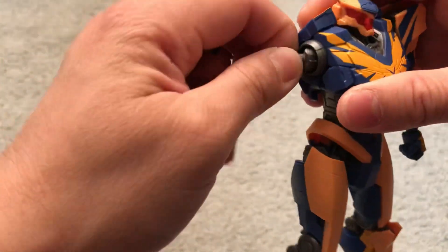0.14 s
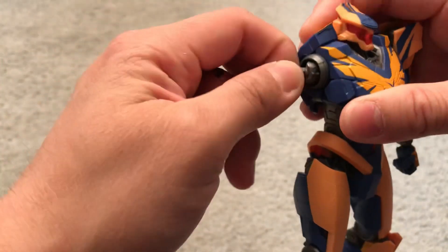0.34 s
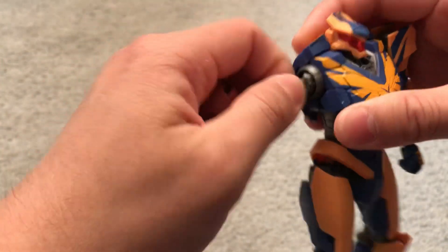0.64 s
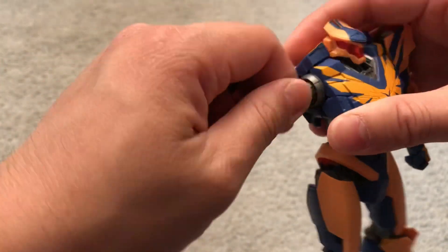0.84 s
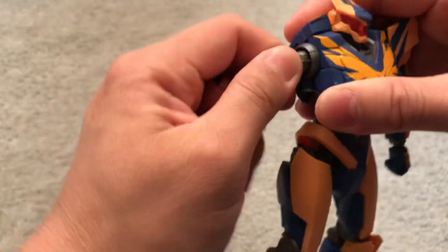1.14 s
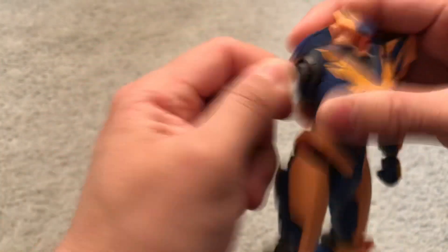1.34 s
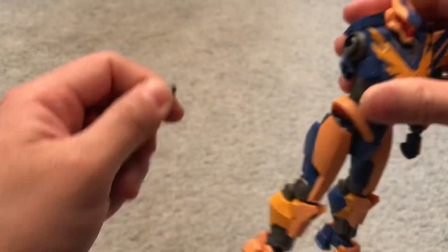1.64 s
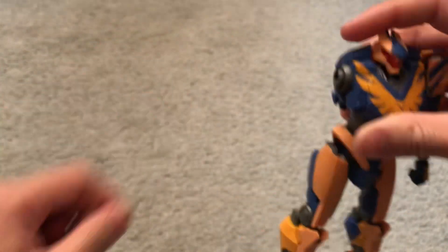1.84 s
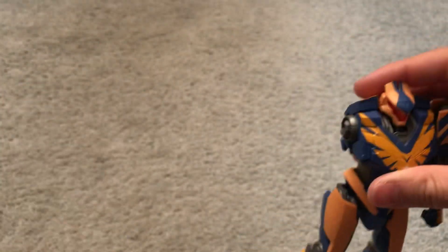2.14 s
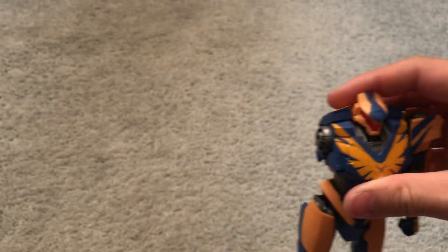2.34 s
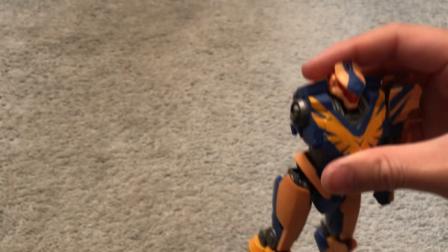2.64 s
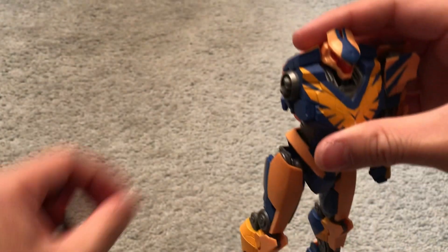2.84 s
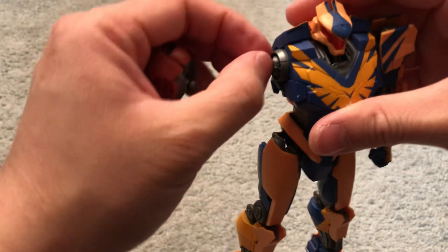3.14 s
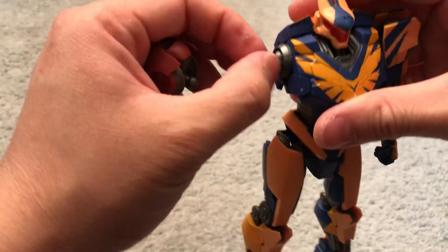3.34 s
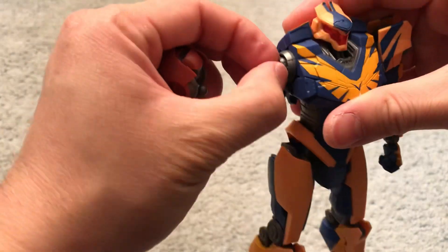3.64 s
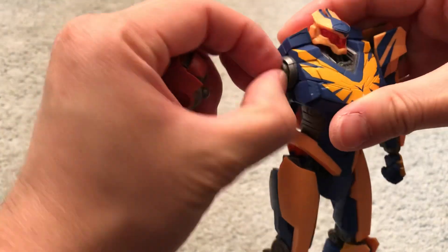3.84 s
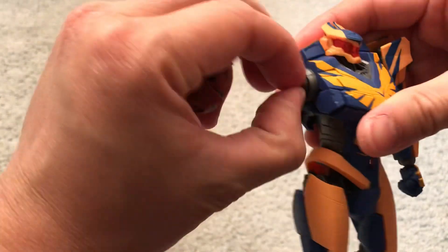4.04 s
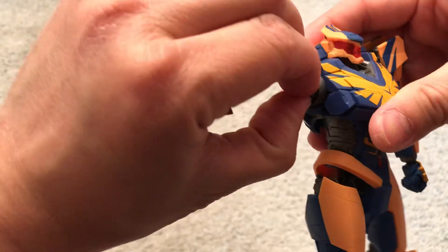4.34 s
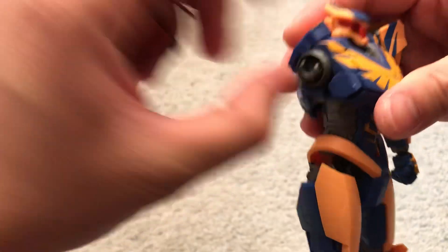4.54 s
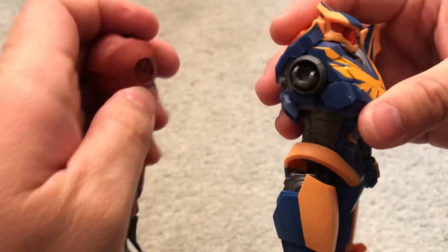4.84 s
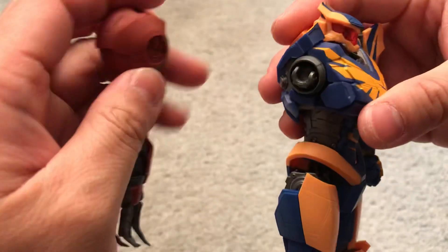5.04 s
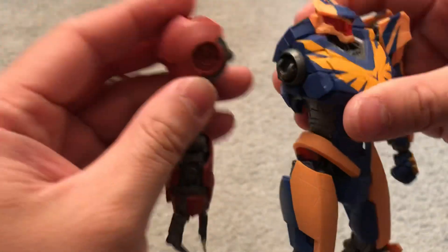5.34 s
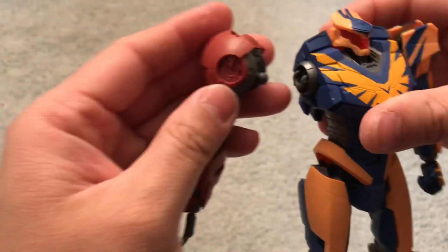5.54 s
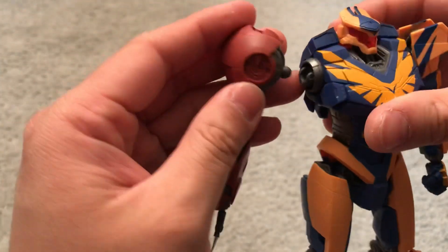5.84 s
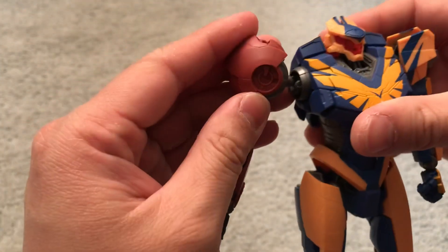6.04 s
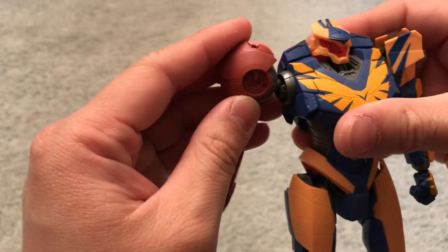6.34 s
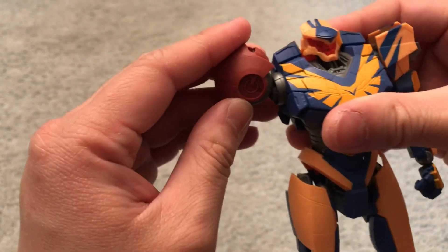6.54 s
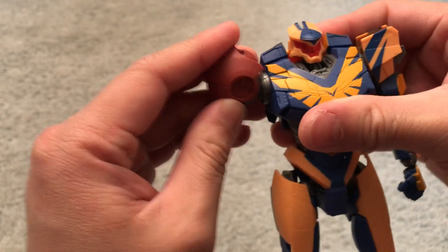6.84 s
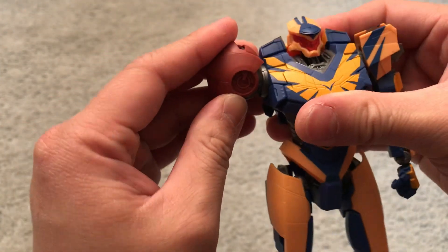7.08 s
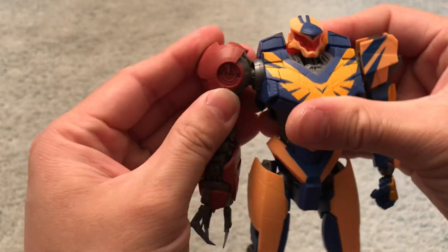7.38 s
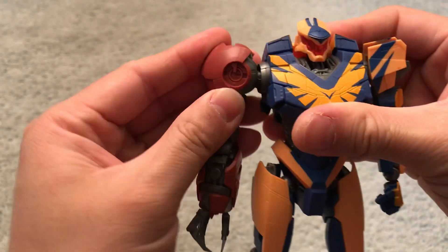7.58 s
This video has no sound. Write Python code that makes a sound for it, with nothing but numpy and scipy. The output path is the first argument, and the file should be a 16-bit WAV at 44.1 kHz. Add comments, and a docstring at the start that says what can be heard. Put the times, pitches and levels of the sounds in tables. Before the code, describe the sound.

Hard plastic toy joints click and snap close up while fingers rub and squeak on the shell, over faint low hum and hiss.

```python
"""Twisting the joints of a plastic toy

Hands twist and plug the joints of a hard plastic toy figure close to the microphone in a carpeted room.
Joints slip and snap in tiny volleys and fingers rub the hollow shell: both set its modes ringing, and the
room answers. Rubs also squeak, and padded contacts thump in one low mode. A motor hums in multiples of
its turning rate beside a mains buzz and a rising tone; noise makes the hiss and a low rush that swells twice."""
import sys
import numpy as np
from scipy import signal
from scipy.fft import rfft, irfft, next_fast_len
from scipy.io import wavfile
from scipy.ndimage import map_coordinates

SR = 44100
rng = np.random.default_rng(int(sys.argv[2]) if len(sys.argv) > 2 else 0)


def put_to_file(sound):
    """Save the sound as 16-bit audio at rate SR, in the file named by the first command-line argument."""
    columns = np.atleast_2d(sound).T  # one column per channel
    safe = np.clip(columns, -1, 1)
    whole_steps = np.round(safe * 32767)
    wavfile.write(sys.argv[1], SR, whole_steps.astype(np.int16))


N = 340011   # length of the sound in samples


def from_db(db):
    """Turn decibels into a plain factor."""
    return 10 ** (np.asarray(db) / 20)


def rms_one(x):
    """Scale a sound so that its average strength (rms) is 1."""
    return x / np.sqrt(np.mean(x ** 2) + 1e-20)


def in_time(rows):
    """Columns of a curve table, joined by straight lines, at every sample."""
    s, *columns = np.transpose(rows)
    return [np.interp(np.arange(N) / SR, s, c) for c in columns]


def at_hz(hz, table_hz, values):
    """Read a curve at a pitch; pitch is spaced by ratio, as the ear hears it."""
    return np.interp(np.log(hz), np.log(table_hz), values)


def drift(rate):
    """Slow random wandering of spread about 1, with about rate changes a second."""
    knots = rng.standard_normal(int(N / SR * rate) + 2)
    return map_coordinates(knots, [np.arange(N) / SR * rate], order=3)


def ring(x, hz, t60):
    """A resonance: a unit click starts a sine of height 1 that falls 60 dB in t60 seconds."""
    r = from_db(-60 / (t60 * SR))
    w = 2 * np.pi * hz / SR
    return signal.lfilter([0, np.sin(w)], [1, -2 * r * np.cos(w), r * r], x + 1e-18)


def shaped(spectrum):
    """Noise of rms 1 that follows a (Hz, dB) curve and fades steeply below its first pitch."""
    size = next_fast_len(N)
    hz = np.maximum(np.arange(size // 2 + 1) * SR / size, 1)
    low_fade = np.minimum(hz / spectrum[0][0], 1) ** 4
    gain = from_db(at_hz(hz, *np.transpose(spectrum))) * low_fade
    return rms_one(irfft(rfft(rng.standard_normal(size)) * gain, size)[:N])


# Motor hum. Each row: time in seconds, level in dB of the 2nd and of the 3rd multiple of the turning rate.
MOTOR = [(0, -73, -62), (.3, -57.5, -64.5), (1.5, -55.5, -61.5), (1.85, -68, -62.5), (2.5, -56.5, -58),
         (3.7, -59, -60.5), (4.2, -55.5, -58), (5, -59, -56), (5.6, -56, -60), (6.2, -57, -55.5),
         (7.05, -64, -59), (7.3, -53.5, -58), (7.71, -56, -59)]
# A faint tone that rises and fades. Each row: time in seconds, pitch in Hz, level in dB.
RISING_TONE = [(0, 69.45, -68), (.7, 74.5, -68), (1.3, 78.4, -59), (1.8, 80.5, -83)]
TURNS_HZ, FOURTH_DB, FIFTH_DB = 22.35, -67.5, -70.5   # mean turning rate; level of its 4th and 5th multiple
MAINS_HZ, MAINS_DB = 120.5, -62


def hum(waver_db):
    """A motor sounds at multiples of its turning rate; mains buzz and rising tone join, all wavering a little."""
    turns = TURNS_HZ * (1 + .006 * drift(2.2))
    multiples_db = [*in_time(MOTOR), FOURTH_DB, FIFTH_DB]
    tones = [(k * turns, db + waver_db * drift(3.9)) for k, db in enumerate(multiples_db, start=2)]
    for hz, db in ((np.full(N, MAINS_HZ), MAINS_DB), in_time(RISING_TONE)):
        tones.append((hz, db + 0.71 * drift(4.3)))
    out = np.zeros(N)
    for hz, db in tones:
        phase = 2 * np.pi * np.cumsum(hz) / SR + rng.uniform(0, 6.8)
        out += from_db(db) * np.sin(phase)
    return np.sqrt(2) * out   # makes each level an rms level


# Colour of room air and microphone hiss. Each row: pitch in Hz, relative level in dB per Hz.
AIR = [(25, -13), (45, -2.5), (75, -1.5), (130, -11.5), (300, -15.5), (500, -20.5), (1000, -25),
       (2500, -30), (6000, -33.5), (8000, -36.5), (9200, -34.5), (10500, -38.5), (12000, -31),
       (15500, -38.5)]
AIR_DB = -65   # rms level of the whole hiss


def air():
    """Room air and microphone hiss: steady noise, strongest in the bass."""
    return from_db(AIR_DB) * shaped(AIR)


KNEE_HZ = 4200   # a contact's push changes slope at this pitch
BEND_DB = -1.0   # the push droops far from the knee, in dB per octave squared


def colour_db(rows, hz):
    """How hard each contact drives a mode at hz: two slopes that meet at the knee."""
    level_db, below, above = np.transpose(rows)[-4:-1]
    octaves = np.log2(hz / KNEE_HZ)
    slope = np.where(octaves < 0, below, above)
    return level_db + octaves * (slope + BEND_DB * octaves)


# Joint clicks. Each row: start in seconds, favoured pitch in Hz, its lift in dB, relative level in dB at the knee,
# slope below and slope above the knee in dB per octave, relative dB sent past the hands into the room.
CLICKS = [(0.0523, 2350, 3.7, -50, 4, -13, -5), (0.0893, 2300, 3.9, -65, -8, -7, 1),
          (0.138, 4600, 5.7, -48.5, 8, -4.5, -11), (0.2271, 4400, 3.7, -44.5, 7, -4, -7),
          (0.3739, 6050, 10, -50, 7, -5, -10), (0.4948, 4690, 6, -47, 2, 0, -6),
          (0.5715, 4360, 5, -61, 5, -1.5, 0), (0.6103, 4570, 4.3, -44.5, 8.5, -6, -3.5),
          (0.7765, 4130, 5, -57, 10, -7, -6), (0.8105, 2100, 5.5, -54.5, 4, -5, -3),
          (0.8494, 8270, 5, -79, 0, 6, -4), (0.9542, 4520, 5.8, -57.5, 3, -5, -1),
          (0.9758, 4650, 5, -68, -3, -7, -2), (1.0158, 4260, 5, -76, 2, 0, -4),
          (1.115, 2410, 4.6, -77, -4, -2, -1), (1.2252, 5600, 5, -54.5, 1.5, -1.5, -7),
          (1.2877, 4570, 5, -54.5, 4, -5.5, -4), (1.3287, 9600, 5.7, -32.5, 0, 1, -6),
          (1.357, 5940, 5, -52, 10, -3, -9), (1.4703, 2520, 5, -58, -1, -10.5, 1),
          (1.5206, 2890, 5, -81, -5, -1, -4), (1.586, 6100, 5, -46.5, 9.5, -6.5, -5),
          (1.6767, 5640, 8, -75, 4, 0, -4), (1.7201, 2400, 8, -64.5, 1, 5, -3),
          (1.7417, 6200, 7.1, -56, 5.5, -1.5, 1), (1.9477, 14530, 5, -91, -3, 15, -4),
          (2.5467, 2420, 11, -71, -7, -14, -2), (3.2659, 4400, 5, -69.5, 6, -5, -4),
          (3.3622, 5170, 5, -62.5, 2, 1.5, 1), (3.367, 2460, 5.6, -55, 4, -4.5, -4),
          (3.483, 2330, 5.7, -64.5, 6, -7, -2), (3.7274, 5750, 6.7, -61.5, 8, 4.5, -1),
          (3.82, 2330, 5.9, -58.5, 1, -13, -8), (3.8925, 4690, 6, -76.5, -6, -3, -4),
          (3.9499, 4530, 6, -55.5, -0.5, -8.5, -1), (4.0678, 4420, 9, -52.5, 5.5, -4, -5),
          (4.4357, 3050, 6.7, -61.5, -3.5, -12, 0), (4.618, 6190, 5, -58, 8, -11, 0),
          (4.6484, 2950, 7.4, -70, -3, -2, -2), (4.84, 2970, 7.5, -64.5, -4.5, -11, -1),
          (5.129, 2400, 11, -74, -6, -14, 0), (5.1878, 1970, 14, -67, 2, -10, -7),
          (6.1742, 1980, 5, -63, 1.5, -5, -4), (6.22, 8900, 8, -46, 6, -4, -8),
          (6.5918, 14300, 6, -42, 22, 0, -9), (6.6963, 14800, 6.1, -54, 9, 1, -12),
          (6.8503, 5210, 4.4, -61.5, 8, -2, 7.5), (6.8734, 2480, 6, -18, 11, 1, 1),
          (7.13, 3230, 8, -53.5, 5, -14, -5), (7.192, 3120, 5, -74, -1, -8, -4),
          (7.3379, 8820, 6.1, -60, -0.5, -1, -4), (7.375, 1970, 4.7, -57, 3, -20, -3),
          (7.575, 3280, 7.5, -53.5, 3, -14, -3), (7.6171, 3410, 5, -52.5, 1.5, -14, 0),
          (7.6795, 2230, 5, -85, -10, 0, -4)]
SLIP_MS = 0.27   # a volley is strongest this long after its start
VOLLEY = 700     # samples kept for one volley


def slips(uneven_db):
    """Each click is a short volley of tiny uneven slips that swells and dies."""
    chance = rng.standard_normal((len(CLICKS), 2, VOLLEY))
    age = 1000 * np.arange(VOLLEY) / SR / SLIP_MS
    uneven = from_db(uneven_db * chance[:, 1])
    return chance[:, 0] * uneven * age * np.exp(-age)


# Fingers and parts sliding on the shell; the very short row at 1.325 is a tick just before a snap.
# Each row: start in seconds, length in 900ths of a second, squeak in Hz, relative level in dB at the knee,
# slope below and slope above the knee in dB per octave, squeak level in dB.
RUBS = [(0.162, 17, 5680, -79, 3, 1, -75), (0.553, 22, 2270, -82, 4, -2, -71),
        (0.618, 35, 2280, -79, 9, -2, -72), (0.764, 24, 4500, -75, 11, -1, -78),
        (0.78, 75, 4500, -98, 0, 0, -81), (0.82, 68, 9950, -86, 2, 2, -82),
        (1.235, 12, 2280, -80, -2, -4, -77), (1.325, 1.54, 4700, -44, 3, -5, -49),
        (1.38, 6.6, 11260, -46, 5, 7, -30), (1.745, 43, 13740, -97, 2, 3, -68),
        (1.752, 124, 2320, -85, 7, 4.5, -70), (1.915, 92, 2300, -92, 4, 4, -73.5),
        (1.93, 45, 14500, -98, 0, 12, -68), (2.655, 65, 13310, -93.5, 0, 7.5, -86),
        (3.095, 19.5, 2420, -86, -3, -4, -70.5), (3.12, 20.6, 3250, -65.5, 3, -7.5, -70),
        (3.19, 33, 4280, -79, 4, -2, -79), (3.255, 41, 4440, -80.5, 6, -2, -82),
        (3.289, 59, 4350, -69.5, 7, -6, -69.5), (3.825, 32, 4720, -89, 0, 4, -77),
        (4.12, 48, 8010, -93, -1, 3, -83), (4.46, 40, 9500, -80.5, 3, 1.5, -77),
        (4.649, 36, 3080, -80, 4, -1, -72), (4.7, 44, 3000, -95, 0, 3, -79),
        (4.705, 50, 8700, -86, 5, 4.5, -72), (4.879, 41, 3000, -85, 2, 8, -73),
        (4.917, 37, 9000, -81, 6, 7.5, -69), (5.06, 26, 3080, -85.5, -1, 2, -77),
        (5.134, 48, 5470, -82.5, 2, 0, -84), (5.182, 36, 2110, -77, 5, -2, -67),
        (5.42, 63, 9070, -88.5, -2, 2, -78), (5.793, 25.5, 6780, -72, 17, 0, -62),
        (5.929, 35, 6940, -88, -1, 3, -76), (6.188, 49, 5000, -71, 11, -3, -78),
        (7.509, 48, 2471, -80.5, -7.5, 1, -78), (7.625, 30, 8400, -82, 1, 0, -79)]


def stroke(length):
    """Pressure through one rub or tick: soft at both ends."""
    return signal.windows.tukey(int(length * SR / 900), .4)


def rubbing(levels_db):
    """Pressure of all the rubs and the tick over time, each at its level."""
    out = np.zeros(N)
    for (s, length, *_), level_db in zip(RUBS, levels_db):
        start, shape = int(s * SR), stroke(length)
        out[start:start + len(shape)] += from_db(level_db) * shape
    return out


# Modes of the hollow shell. Each row: pitch in Hz, relative dB when struck, relative dB when rubbed,
# time in seconds to fall 60 dB when struck.
SHELL = [(624, -9.5, -26, 0.0055), (970, -2.5, -6.5, 0.0045), (1257, -3, -19, 0.011),
         (1510, -6.5, -12, 0.014), (2012, 0.5, -12, 0.0091), (2362, -1.5, -1.5, 0.015),
         (2967, -2.5, -18, 0.0079), (3265, -2.5, 0.5, 0.01), (3770, 1, -1, 0.0031), (4234, -1, 0.5, 0.007),
         (4585, -0.5, -5, 0.012), (5440, 0, -1, 0.0087), (5890, -2, -3, 0.0083), (6060, 1.5, -1.5, 0.01),
         (6980, 2.5, 4, 0.0034), (7980, -4, -3, 0.012), (8720, 3, 2, 0.0039), (9660, -2.5, -3, 0.0099),
         (10380, 0, -3, 0.0056), (11624, -1, 3, 0.0056), (12140, -0.5, 2.5, 0.01), (13620, -2.5, 6, .004),
         (14300, 3.5, -7, 0.0051), (15400, -2.5, -9, 0.016)]
PLACE_DB = 1.5       # random spread in how each click meets each mode
RADIATES_HZ = 600    # the small shell sends out little below this


def shell(click_db, rub_db):
    """Slips and rubbing drive the modes of the shell; returns the near sound and what spreads into the room."""
    rows, volleys = np.array(CLICKS), slips(uneven_db=5.5)
    near, around = np.zeros(N), np.zeros(N)
    at = (rows[:, :1] * SR).astype(int) + np.arange(VOLLEY)
    # the surfaces catch unevenly; neighbouring modes take turns between two grains
    grain = rms_one(rng.standard_normal((2, N)) * from_db(3.4 * drift(400)))
    place = rng.standard_normal((len(rows), len(SHELL)))
    energy = np.sqrt(np.sum(volleys ** 2, axis=1))
    for k, (hz, struck_db, rubbed_db, t60) in enumerate(SHELL):
        # divide out a volley's own push at this pitch, within limits, so the table sets the level
        felt = np.abs(volleys @ np.exp(-2j * np.pi * hz * np.arange(VOLLEY) / SR))
        favour = np.exp(-(np.log(hz / rows[:, 1]) / 0.13) ** 2)
        lift_db = PLACE_DB * place[:, k] + rows[:, 2] * favour
        blow_db = colour_db(rows, hz) + click_db + struck_db
        strength = from_db(blow_db + lift_db) / np.maximum(felt, 0.51 * energy)

        pushes = np.zeros((2, N + VOLLEY))
        np.add.at(pushes[0], at, volleys * strength[:, None])
        pushes[1, at[:, 0]] = from_db(blow_db + rows[:, -1])   # afar, a volley is one blow
        direct, spread = (-1) ** k * pushes[:, :N]
        rub = rubbing(colour_db(RUBS, hz) + rub_db + rubbed_db) * grain[k % 2]
        # a light sliding touch damps less than a grip
        near += ring(direct, hz, t60) + ring(rub, hz, 1.74 * t60)
        # each mode beams its own way and meets the walls at its own time
        spread = np.roll(spread, rng.integers(0, 450))
        # heard from all sides at once, the peaks run together
        around += np.sqrt(3) * ring(spread + rub, hz, t60 / 3)
    low_cut = signal.butter(2, RADIATES_HZ, "high", fs=SR, output="sos")
    return signal.sosfilt(low_cut, [near, around])


# Floor and nearest walls. Each row: delay in ms, smear in ms, level in dB.
ECHOES = [(3.5, 1.9, -14.5), (8.5, 4.1, -20.5), (15.5, 8.1, -24.5)]
# How long the room rings. Each row: pitch in Hz, time in seconds to fall 60 dB.
ROOM = [(300, 0.14), (1600, 0.25), (4200, 0.35), (8000, 0.25), (16000, 0.21)]
ROOM_DB, ROOM_START_MS = -21, 1.4   # level of the tail; time it takes to fade in


def room(x):
    """A few early echoes, and a noise tail that dies at its own pace in each band."""
    t = np.arange(SR // 2) / SR
    edges = 200 * 2 ** np.arange(0, 6.6, .5)   # half-octave bands, in Hz
    tail = np.zeros(len(t))
    for low, high in zip(edges, edges[1:]):
        band_pass = signal.butter(2, [low, high], "band", fs=SR, output="sos")
        band = signal.sosfilt(band_pass, rng.standard_normal(len(t)))
        tail += band * from_db(-60 * t / at_hz(low, *np.transpose(ROOM)))
    tail *= np.clip(1000 * t / ROOM_START_MS, 0, 1) ** 2
    answer = from_db(ROOM_DB) * tail / np.sqrt(np.sum(tail ** 2))
    for delay_ms, smear_ms, echo_db in ECHOES:   # uneven surfaces smear each echo
        late = 1000 * t - delay_ms
        echo = rng.standard_normal(len(t)) * (late > 0) * (late < smear_ms)
        answer += from_db(echo_db) * echo / np.sqrt(np.sum(echo ** 2))
    return signal.fftconvolve(x, answer)[:N]


def squeaks(t60):
    """Each rub or tick also keeps one narrow resonance of the gripped part singing roughly."""
    out, noise, rows = np.zeros(N), rng.standard_normal(N), np.array(RUBS)
    for (s, length, hz), squeak_db in zip(rows[:, :3], rows[:, -1]):
        i = int(s * SR)
        shape = np.pad(stroke(length), (0, 900))   # time to ring on after the stroke
        out[i:i + len(shape)] += from_db(squeak_db) * ring(shape * noise[i:i + len(shape)], hz, t60)
    return out / np.sqrt(t60 * SR / (4 * np.log(1000)))   # evens out the build-up of a long ring


# Soft thumps. Each row: start in seconds, relative level in dB, pitch in Hz, time in seconds to fall 60 dB.
THUMPS = [(1.248, -58, 240, 0.053), (1.325, -54.5, 258, 0.036), (2.546, -41, 282, 0.034),
          (3.111, -57, 245.7, 0.043), (5.127, -48.5, 252, 0.022), (6.871, -45.5, 218, 0.04),
          (7.419, -56.5, 173, 0.037)]


def thumps(soft_ms):
    """A padded contact: a rounded push of soft_ms into one low mode."""
    out, push = np.zeros(N), np.hanning(int(soft_ms * SR / 1000))
    for s, level_db, hz, t60 in THUMPS:
        i = int(s * SR)
        span = min(SR // 4, N - i)
        padded = np.pad(push / push.sum(), (0, span))[:span]
        out[i:i + span] += from_db(level_db + 9.5) * ring(padded, hz, t60)
    return out


# A low rush that swells twice. Each row: start of the rise in seconds, start of the fall in seconds, level in dB.
RUSH = [(5.42, 6.116, -67), (7.187, 7.8, -65)]
# Its two resonances. Each row: pitch in Hz, approximate width in Hz, relative level in dB.
RUSH_PEAKS = [(316, 70, 1), (490, 360, -9.5)]
RUSH_RISE_S, RUSH_FALL_S = 0.069, 0.047


def rush():
    """Fluttering noise through two low resonances; each swell rises, holds and falls."""
    white, t = rng.standard_normal(N), np.arange(N) / SR
    body, swells = np.zeros(N), np.zeros(N)
    for hz, width, db in RUSH_PEAKS:
        body += from_db(db) * rms_one(ring(white, hz, 2.34 / width))   # a narrow peak rings longer
    for s, end, db in RUSH:
        corners = [s, s + RUSH_RISE_S, end, end + RUSH_FALL_S]
        swells += from_db(db) * np.interp(t, corners, [0, 1, 1, 0])
    return swells * from_db(2.0 * drift(12)) * rms_one(body)


def scene():
    """Add up the toy, the room's answer, the hum, the rush and the hiss, as one channel."""
    near, around = shell(click_db=8.5, rub_db=-14.5)
    near += thumps(soft_ms=3.82) + squeaks(t60=0.017)
    background = hum(waver_db=1.0) + rush() + air()
    return (near + room(around) + background)[None]


LIMIT_DB, RELEASE_DB_S = -3.5, 11.5   # peaks above the limit turn the level down; it recovers at this rate
CUTOFF_HZ = 16900   # from here up, the treble is at least 60 dB down


def record(dry):
    """Gain control ducks after the loudest peaks and climbs back; the top of the treble is cut."""
    climb = RELEASE_DB_S * np.arange(N) / SR
    over_db = np.maximum(20 * np.log10(np.abs(dry[0]) + 1e-9) - LIMIT_DB, 0)
    held_db = np.maximum.accumulate(over_db + climb) - climb
    duck_db = signal.lfilter([.01], [1, -.99], held_db)   # the ducking sets in smoothly
    low_pass = signal.cheby2(14, 60, CUTOFF_HZ, fs=SR, output="sos")
    cut = signal.sosfilt(low_pass, dry * from_db(-duck_db))
    return np.clip(cut, -1, 1)


dry = scene()
out = record(dry)
put_to_file(out)
```